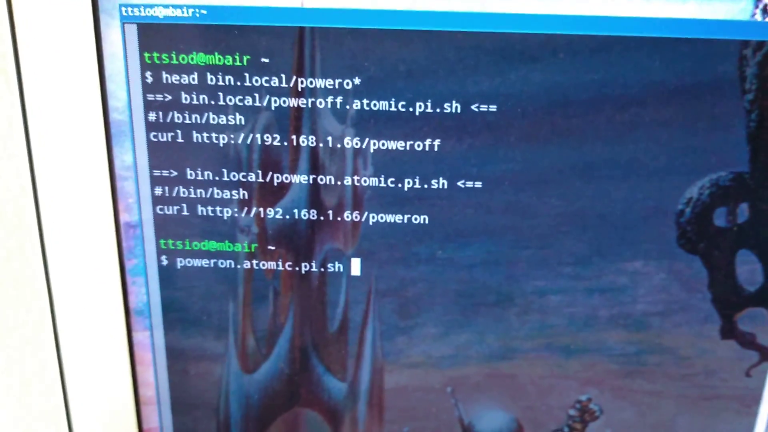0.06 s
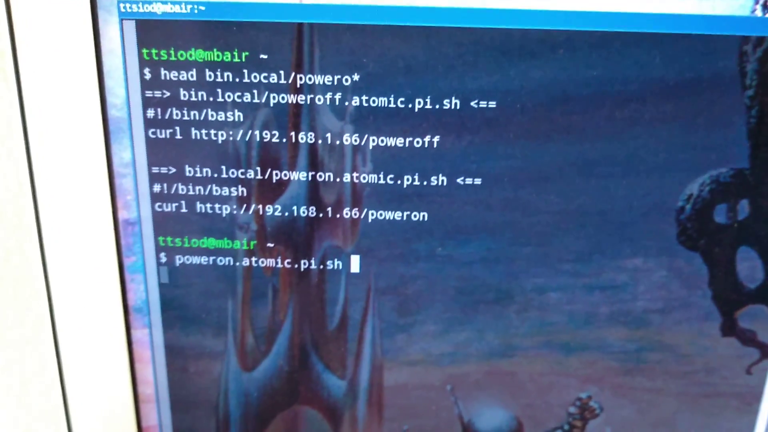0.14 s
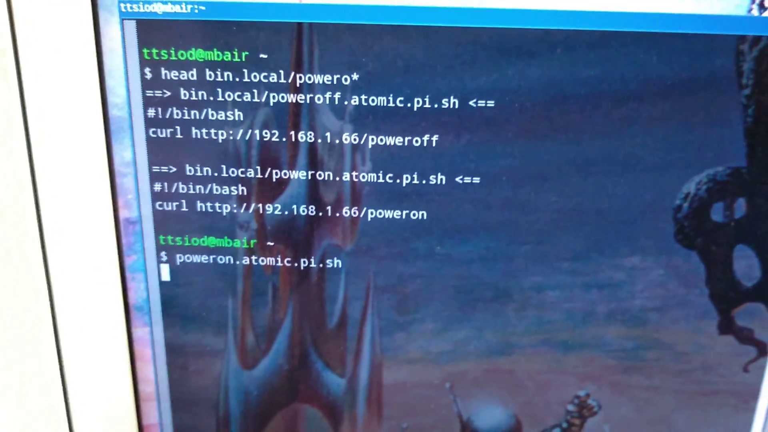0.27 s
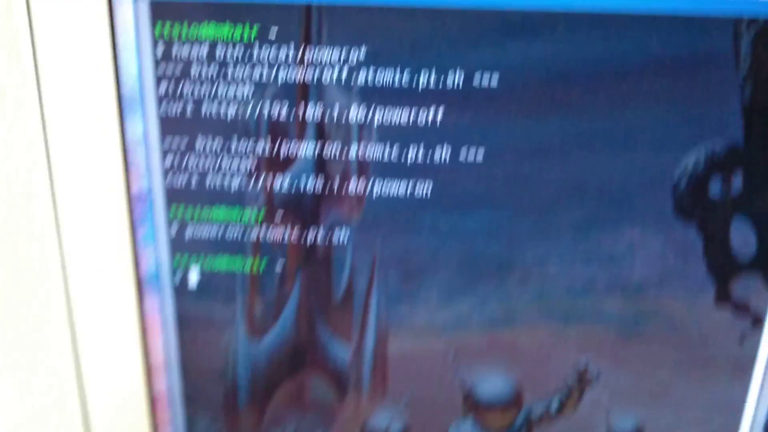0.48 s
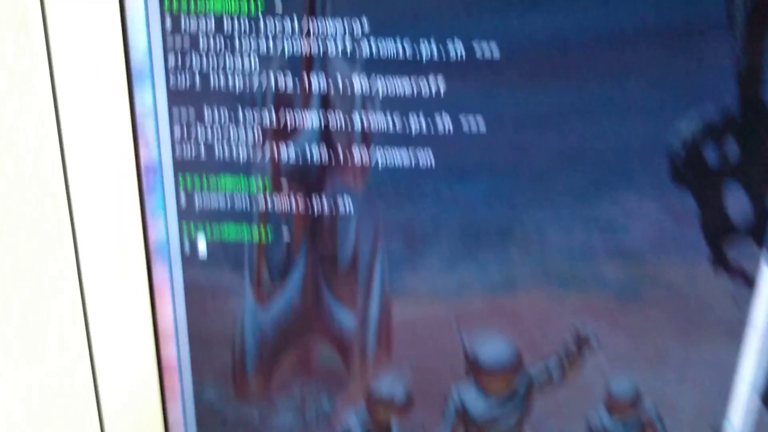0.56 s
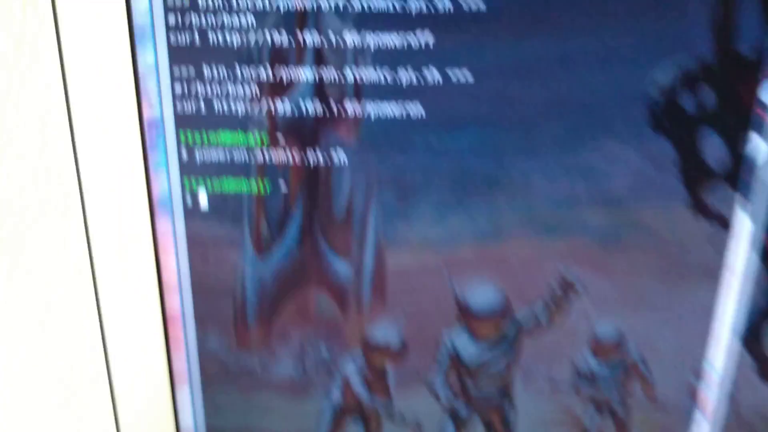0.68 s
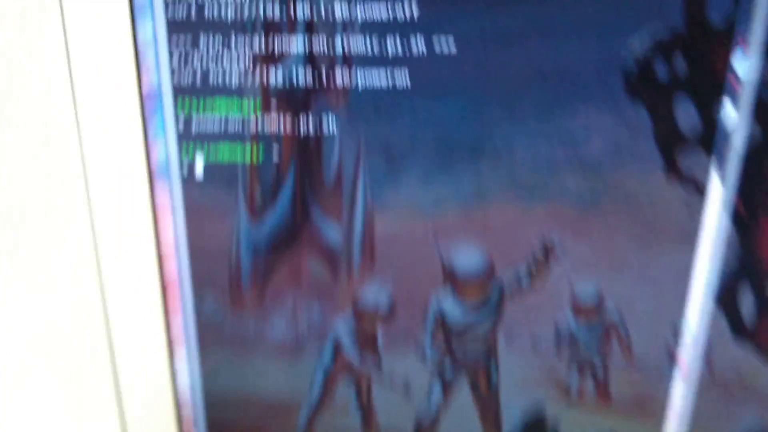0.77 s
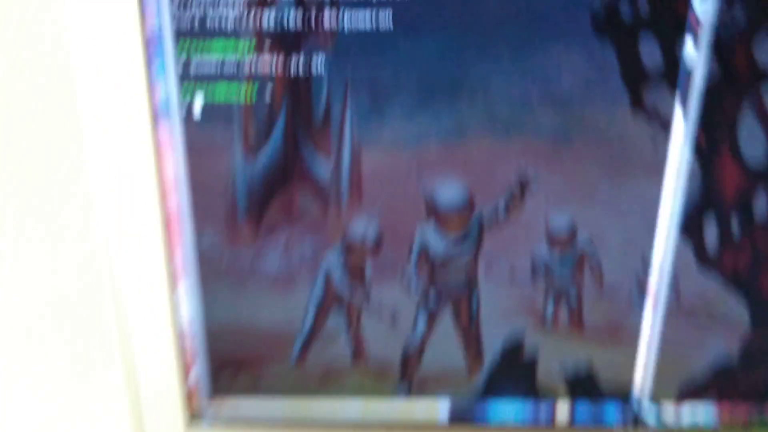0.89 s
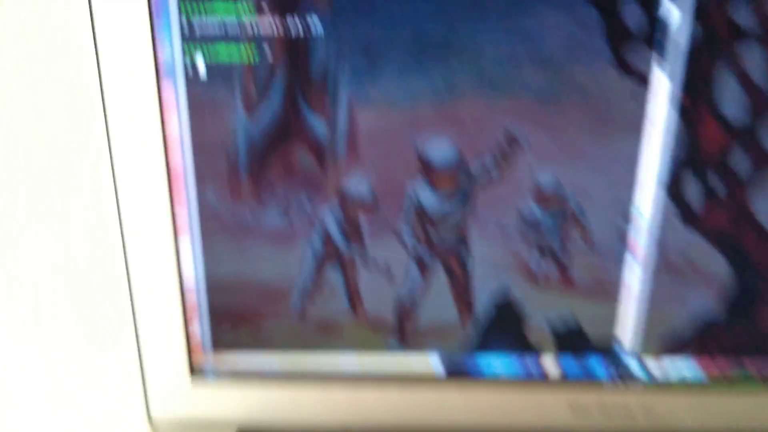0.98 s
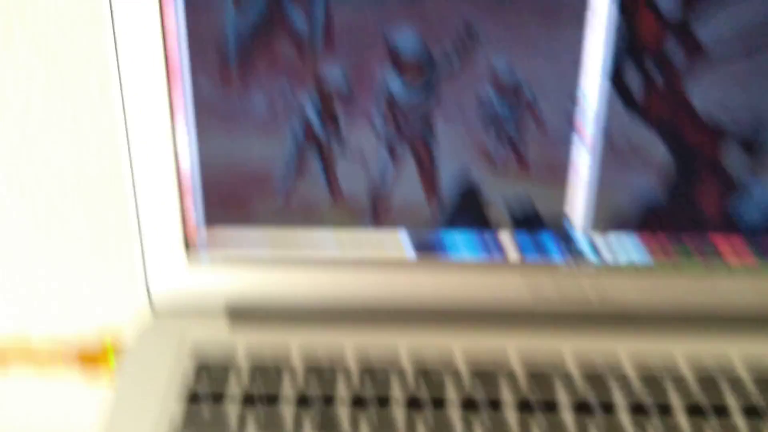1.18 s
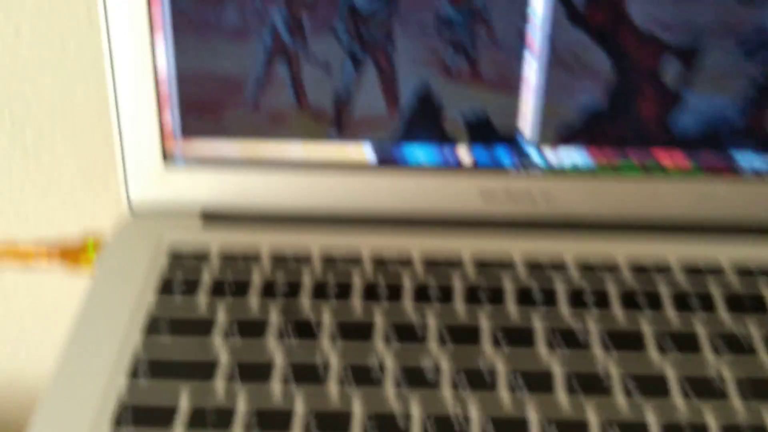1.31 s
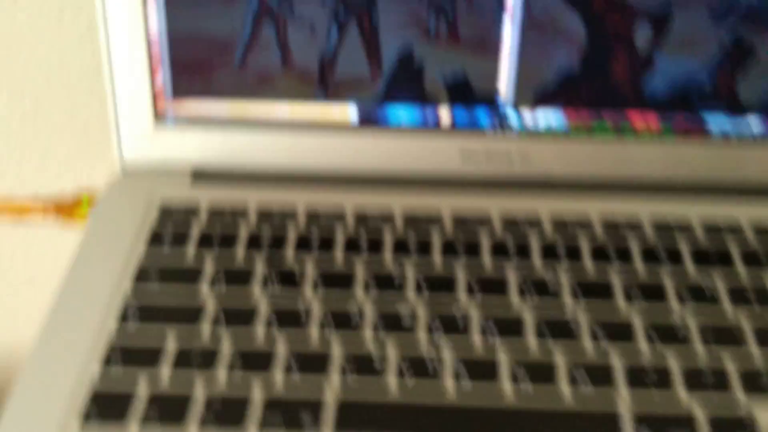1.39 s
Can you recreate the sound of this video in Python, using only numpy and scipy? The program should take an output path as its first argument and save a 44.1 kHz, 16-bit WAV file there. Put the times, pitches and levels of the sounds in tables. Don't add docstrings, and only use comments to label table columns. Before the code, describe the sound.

A single laptop key press, close and sharp, lands at about 0.21 seconds: a plastic rattle and crack, hollow deck knock and low desk thud. A faint release click follows near 0.32. At 0.38 a small, distant metal switch snaps with a very high tick and shimmering room echo. Quiet hiss and hum continue, with a soft low handling bump around 0.97 in the hand-held stereo pickup.

```python
import sys
import numpy as np
from scipy import signal
from scipy.fft import rfft, irfft
from scipy.io import wavfile
from scipy.ndimage import uniform_filter1d

SR = 44100
rng = np.random.default_rng(int(sys.argv[2]) if len(sys.argv) > 2 else 0)


def master_out(mix):
    frames = np.transpose(np.atleast_2d(mix))
    ceiling = np.clip(frames, -1, 1)
    pcm = np.round(ceiling * 32767).astype(np.int16)
    wavfile.write(sys.argv[1], SR, pcm)


def attenuation_scalar(level_db):
    decades = np.asarray(level_db, float) / 20
    return 10 ** decades


N = 63945
TIME_S = np.arange(N) / SR
FREQ_HZ = np.fft.rfftfreq(N, 1 / SR)
PORT = np.array([[0], [1]])


def shift(x, delay_s, gain=1):
    return irfft(rfft(x) * gain * np.exp(-2j * np.pi * FREQ_HZ * delay_s), N)


def colour(table):
    hz, db = np.array(table).T
    return attenuation_scalar(np.interp(np.log(FREQ_HZ + 1), np.log(hz), db, left=-60))


def peaks(table):
    return sum(attenuation_scalar(db) / (1 + ((FREQ_HZ + 1 - hz) / (width / 2)) ** 2) for hz, width, db in table)


def steep(hz):
    return 1 / (1 + (hz / (FREQ_HZ + 1)) ** 6)


def noise(gain, alike=0.0):
    white = rng.standard_normal((3, N))
    common, separate = white[0], white[1:]
    x = shift(np.sqrt(alike) * common + np.sqrt(1 - alike) * separate, 0, gain)
    return x / x.std()


def fade(start, t60, rise=0.00016):
    t = np.maximum(TIME_S - start, 0)
    return (1 - np.exp(-t / rise)) * attenuation_scalar(-60 * t / t60)


def ring(start, hz, t60, lag=0.0):
    return fade(start, t60, 0.00025) * np.sin(2 * np.pi * hz * (TIME_S - start) - lag)


def modes(start, table):
    return sum(attenuation_scalar(db) * ring(start, hz, t60, lag * PORT) for hz, db, t60, lag in table)


def walk(rate):
    width = int(SR / rate)
    w = uniform_filter1d(uniform_filter1d(rng.standard_normal((2, N)), width), width)
    return w / w.std()


# frequency in Hz, level in dB.
HISS_COLOUR = [(60, -17), (150, -6.5), (350, -10), (1000, -15), (3000, -21.5), (6000, -30), (10000, -33.5),
               (14000, -38.5)]


def port_hiss():
    level_db, flicker_db, tilt_db = -62.5, 0.86, 1
    return noise(colour(HISS_COLOUR)) * attenuation_scalar(level_db + flicker_db * walk(20)[0] + tilt_db * (2 * PORT - 1))


# frequency in Hz, width in Hz, level in dB.
HUM_PEAKS = [(114.5, 60, -4.5), (145, 20, -1), (187, 24, -5.5), (221.6, 18, -3.5), (262.5, 30, -10),
             (444, 350, -23)]


def room_hum():
    level_db, flicker_db = -53.5, 1.46
    return noise(peaks(HUM_PEAKS), 0.93) * attenuation_scalar(level_db + flicker_db * walk(21)[0])


def hand_rumble(movement_db):
    level_db, flicker_db = -56.5, 1
    rumble = noise(peaks([(63.6, 90, 0)]) * steep(25), 0.43)
    return rumble * attenuation_scalar(level_db + flicker_db * walk(29) + movement_db)


# time in seconds, recorder gain in dB, hand movement in dB.
GAIN_AND_HAND = [(0, -4, -7.5), (.2, -2.5, -15.5), (.4, -1.5, -5.5), (.6, -2, -2.5), (.8, 1, -0.5),
                 (.97, 0, 5.5), (1.1, 1, -6), (1.25, 2.5, -6), (1.45, 1, 8)]


def background():
    at_s, gain_db, hand_db = np.array(GAIN_AND_HAND).T
    bed = port_hiss() + room_hum() + hand_rumble(np.interp(TIME_S, at_s, hand_db))
    return bed * attenuation_scalar(np.interp(TIME_S, at_s, gain_db))


# start in seconds, level in dB, pitch in Hz, decay in seconds,
# share at the second port (negative is inverted).
HAND_BUMPS = [
    (.965, -31, 44, .05, -0.28),
    (0.98, -42, 310, 0.13, 0.68),
    (1.9, -48, 110, .05, -.1),
]


def hand_bumps():
    return sum(attenuation_scalar(db) * ring(start, hz, t60) * np.array([[1], [far]])
               for start, db, hz, t60, far in HAND_BUMPS)


# frequency in Hz, width in Hz, level in dB.
WALL_PEAKS = [(5920, 700, -9.5), (7200, 760, -11), (7790, 770, 5), (9440, 760, 5), (11750, 1200, -6.5),
              (13800, 500, -16)]


def switch_walls():
    gap = 1 - 1 / (1 + ((FREQ_HZ - 8620) / 220) ** 4)
    echo = noise(peaks(WALL_PEAKS) * gap, 0.11) * attenuation_scalar(-45.5 + 1.2 * walk(60)[0])
    return echo * fade(0.3952, t60=0.49, rise=0.0047)


# start in seconds, level in dB, decay in seconds.
SWITCH_TICKS = [
    (0.3787, -40, 0.012),
    (.380, -32, 0.017),
    (0.3812, -38.5, 0.018),
    (0.39, -43, 0.0072),
]
# frequency in Hz, width in Hz, level in dB.
SWITCH_BODY = [(4350, 840, -12), (6200, 570, -2), (7630, 780, 0), (9470, 420, 5.5), (11700, 1200, -5.5),
               (13950, 360, -11)]
# frequency in Hz, level in dB, decay in seconds, second port lag in radians.
SWITCH_TONES = [(5870, -39, 0.027, 0.92), (7400, -44, 0.025, 2.1), (9364, -30.5, 0.034, 0.22),
                (9700, -45, 0.026, 0.69)]


def switch_tick():
    chatter = sum(attenuation_scalar(db) * fade(start, t60, 0.00034) for start, db, t60 in SWITCH_TICKS)
    snap_s = SWITCH_TICKS[1][0]
    return noise(peaks(SWITCH_BODY), 0.32) * chatter + modes(snap_s, SWITCH_TONES)


# frequency in Hz, level in dB.
TAIL_COLOUR = [(200, -12), (450, 6), (800, -0.5), (1500, -5), (3000, -10.5), (5000, -24), (8000, -41),
               (15000, -55)]


def key_tail(bottom_s):
    dull = noise(colour(TAIL_COLOUR), 0.53) * attenuation_scalar(-49) * fade(bottom_s, t60=0.46, rise=0.0027)
    air_band = steep(3000) * (1 - steep(12800))
    air = noise(air_band, 0.14) * attenuation_scalar(-57.5) * fade(0.228, t60=0.57, rise=0.0098)
    return dull + air


def desk_thud():
    return attenuation_scalar(-37.5) * ring(0.222, hz=80, t60=0.13)


# frequency in Hz, level in dB, decay in seconds,
# second port lag in radians.
RELEASE_TONES = [(2030, -42, 0.022, 1.34), (5000, -51, 0.014, 0.35), (7550, -54, .012, .8)]


def key_release(release_s):
    return modes(release_s, RELEASE_TONES)


# frequency in Hz, level in dB, decay in seconds, second port lag in radians.
DECK_MODES = [(486, 1.5, 0.035, 0.072), (616, -1.5, 0.023, 0.091), (690, -2, 0.021, 0.27),
              (930, -9, 0.019, 0.33), (1056, -9, 0.019, 0.4), (1200, -5, 0.022, 1.2),
              (1454, 2.5, 0.015, 1.58), (1890, -2.5, 0.022, 2.36), (2530, -4, 0.012, 1.8),
              (3120, -10, 0.016, 0.45), (3520, -9, 0.011, 1.3), (5390, -8.5, 0.008, 0.45)]


def deck_thump(hits):
    thump = 0
    for start, thump_db, _, _ in hits:
        for hz, mode_db, t60, lag in DECK_MODES:
            level_db = thump_db + mode_db - 9 + 0.5 * PORT
            thump = thump + attenuation_scalar(level_db) * ring(start, hz, t60, lag * PORT)
    return shift(thump, 0, steep(440))


# frequency in Hz, level in dB.
CRACK_COLOUR = [(500, -17), (2000, 2.5), (4000, 1.5), (6200, -1), (9500, 0), (12500, -1.5), (14500, -6),
                (16500, -5.5)]


def cap_crack(hits):
    bursts = sum(attenuation_scalar(db) * fade(start, t60) for start, _, db, t60 in hits)
    return noise(colour(CRACK_COLOUR), 0.15) * bursts


# start in seconds, thump level in dB, crack level in dB,
# crack decay in seconds.
KEY_HITS = [
    (0.2106, -44.5, -33.5, 0.018),
    (.2127, -47, -29, 0.0054),
    (0.214, -16.5, -20.5, 0.0039),
    (0.2159, -41, -40.5, 0.022),
    (.222, -44.5, -29, 0.0054),
    (.317, -47.5, -47, 0.023),
]


def key():
    bottom_s, release_s = KEY_HITS[2][0], KEY_HITS[-1][0]
    strike = deck_thump(KEY_HITS) + cap_crack(KEY_HITS)
    return strike + key_tail(bottom_s) + desk_thud() + key_release(release_s)


def scene():
    return background() + hand_bumps() + switch_walls() + switch_tick() + key()


def low_pass(x):
    return signal.sosfilt(signal.butter(12, 14630, fs=SR, output="sos"), x)


def record(dry):
    port_lag_s, port_cancel, cancel_top_hz, top_hz = 0.0004861, 0.78, 6500, 14250
    cancel = port_cancel / (1 + (FREQ_HZ / cancel_top_hz) ** 6)
    sides = dry - shift(dry[::-1], port_lag_s, cancel)
    sides = sides + attenuation_scalar(-88) * rng.standard_normal((2, N))
    mix = shift(sides, 0, 1 / np.sqrt(1 + (FREQ_HZ / top_hz) ** 50))
    return low_pass(mix)


dry = scene()
out = record(dry)
master_out(out)
```